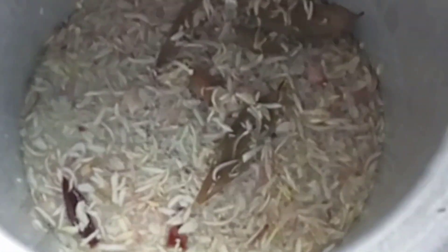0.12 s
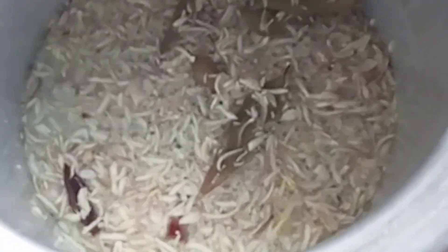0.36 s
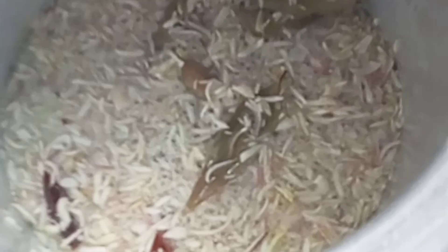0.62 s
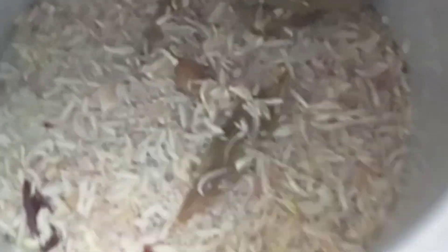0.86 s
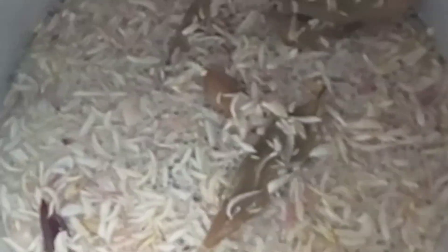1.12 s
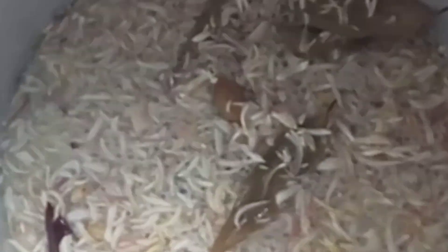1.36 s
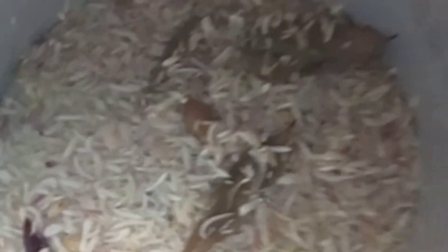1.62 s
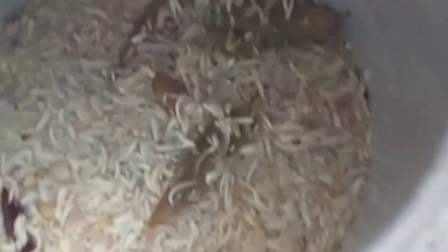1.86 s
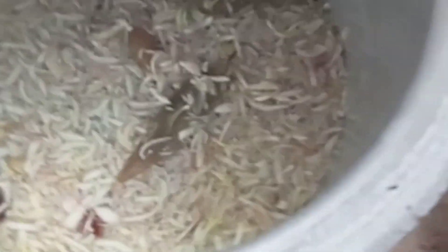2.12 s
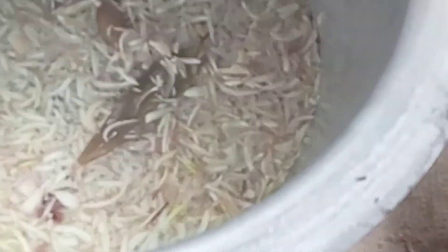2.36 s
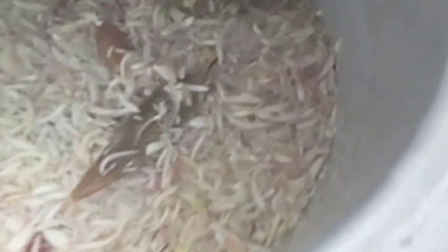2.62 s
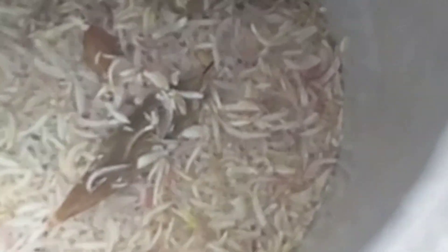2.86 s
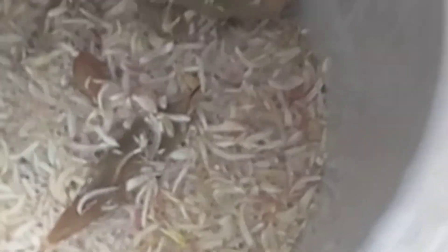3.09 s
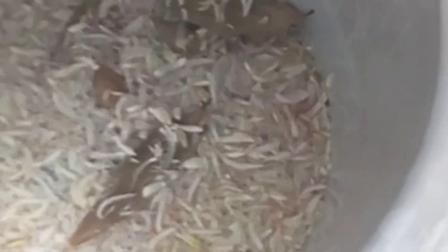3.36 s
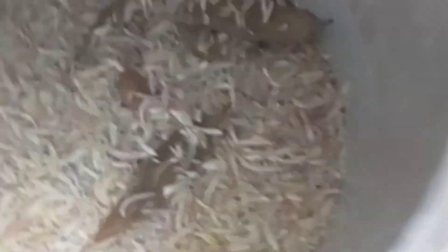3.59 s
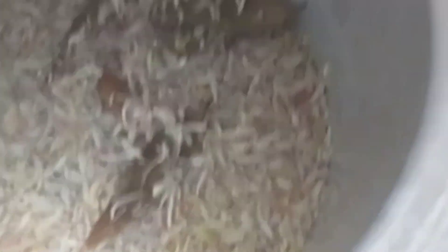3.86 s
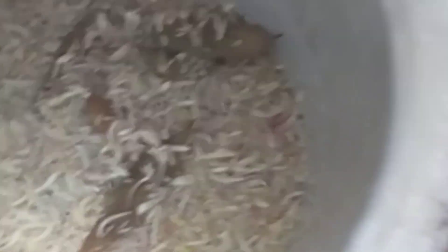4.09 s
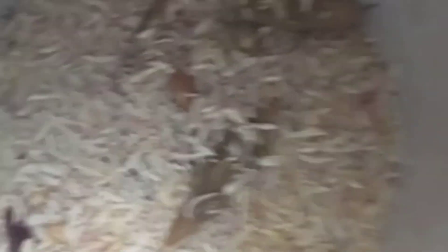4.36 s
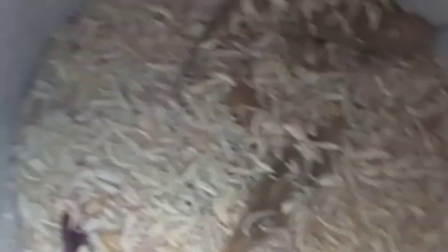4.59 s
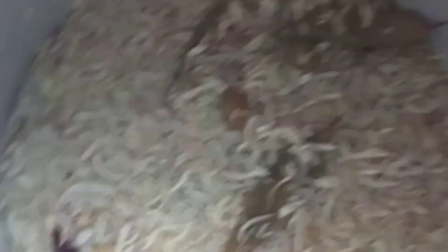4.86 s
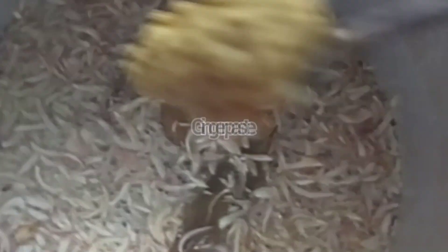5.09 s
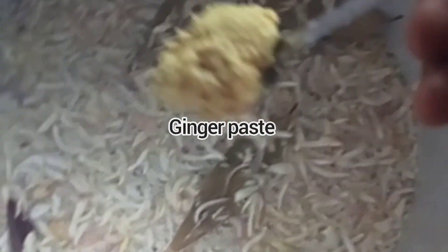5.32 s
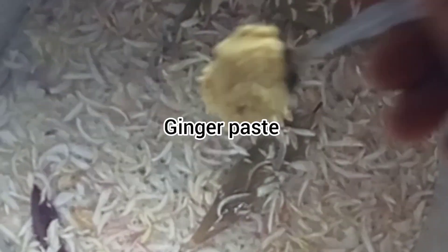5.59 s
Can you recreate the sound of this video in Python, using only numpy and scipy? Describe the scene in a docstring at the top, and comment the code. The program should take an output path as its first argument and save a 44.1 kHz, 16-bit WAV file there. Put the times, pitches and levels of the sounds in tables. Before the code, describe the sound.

Close to a phone microphone in a small kitchen, a metal pot of rice simmers with faint gurgles, thin hiss and low burner rumble. Light ticks begin early, then a utensil knocks and scrapes the pot around 1.5 seconds with a dense run of clicks. Ticks thin out after three seconds, two sharp spits snap near four, and the bubbling ends a little livelier.

```python
"""A pot simmers on a stove in a small kitchen, close to a phone microphone, for 5.7 seconds. Throughout, shaped
noise gives steam hiss and burner rumble, and gliding tones give gurgling bubbles. From 0.3 s damped pot modes
tick, thickest from 1.4 to 2.2 s; from 0.8 s drops spit as noise bursts. At 0.8, 1.2 and 1.5 s a utensil knocks
dully on the pot; at 0.8 s a short rough splash goes with it, and at 1.5 s the utensil scrapes along the pot. An
echo and a short diffuse tail put these events in the room."""
import sys
import numpy as np
from scipy import signal
from scipy.io import wavfile
from scipy.ndimage import uniform_filter1d

SR = 44100
rng = np.random.default_rng(int(sys.argv[2]) if len(sys.argv) > 2 else 0)


def gain_from_db(level_db):
    """Turn a decibel level (scalar or array-like) into a linear amplitude factor."""
    decades = np.asarray(level_db, float) / 20
    return 10 ** decades


def master_out(mix):
    """Clip the mix to full scale and print it as 16-bit PCM to the path in sys.argv[1]."""
    frames = np.transpose(np.atleast_2d(mix))
    ceiling = np.clip(frames, -1, 1)
    pcm = np.round(ceiling * 32767).astype(np.int16)
    wavfile.write(sys.argv[1], SR, pcm)


N = 251811  # length in samples

# All event levels are at the microphone, before the echo and tail of the room.
# Larger bubbles. Each row: start in seconds, peak level in dB, starting pitch in Hz, length in cycles.
BUBBLES = [(.065, -37, 730, 6.9), (0.134, -33, 950, 5.3), (.18, -38, 700, 7), (0.331, -40, 1150, 9.5),
           (0.528, -30.5, 692, 17), (.69, -36, 1120, 8), (1.016, -33, 1320, 6.2), (1.295, -36, 756, 10),
           (1.76, -44, 610, 10), (1.815, -32, 720, 11.6), (2.1, -30, 1540, 12), (2.3, -32, 670, 5.5),
           (2.547, -35.5, 1100, 8.1), (2.606, -38, 930, 14), (2.803, -34.5, 1250, 10),
           (2.8, -40.5, 375, 18), (2.897, -38, 813, 12), (3.044, -35, 1110, 7.7), (3.093, -36, 1050, 13),
           (3.23, -36, 292, 14), (3.28, -30, 920, 8.6), (3.914, -38.5, 790, 18), (3.44, -39, 816, 10),
           (3.77, -40, 800, 6.6), (4.029, -32.5, 1180, 7.4), (4.34, -40, 770, 8.7), (4.461, -35, 1000, 15),
           (4.521, -36, 764, 5.9), (4.723, -42, 594, 11), (4.79, -38, 700, 7), (4.93, -41, 1310, 7),
           (5.024, -48, 695, 8.9), (5.035, -39.5, 279, 19), (5.055, -36, 1250, 6.5), (5.15, -30, 650, 5.8),
           (5.21, -35.5, 254, 6.6), (5.234, -29, 644, 4.5), (5.265, -29, 666, 7.5), (5.279, -32, 766, 7.6),
           (5.4, -45, 700, 23), (5.459, -40.5, 275, 10), (5.54, -37.5, 356, 10.4), (5.546, -32.5, 720, 12),
           (5.668, -33, 680, 5.2)]
# Pitch balance of the small bubbles. Each row: pitch in Hz, relative level in dB.
FROTH = [(250, 3), (420, -9), (680, 2), (1000, -2), (1600, -6.5)]
# Vigour of the boil, before its random surges. Each row: time in seconds, gurgle level in dB.
BOIL = [(0, -51), (.15, -44), (.3, -52), (.7, -47), (1.1, -47.5), (1.3, -46), (1.8, -47), (2.1, -50),
        (2.6, -51), (2.72, -50.5), (3.1, -49.5), (3.6, -51), (4.2, -47), (4.4, -51.5), (4.8, -47.5),
        (5.3, -54), (5.45, -50), (5.71, -50)]
# Clearer ticks on the pot. Each row: start in seconds, peak level in dB, centre in Hz,
# spread in octaves, time until damped to half in ms.
TICKS = [(0.278, -19, 3540, 0.42, 7.1), (0.3024, -25.5, 2930, .33, 2.8), (.3825, -26.5, 4660, 0.58, 3),
         (.6424, -21, 3300, 1.3, 4), (0.8302, -21.5, 2810, 0.44, 5), (.9048, -23, 4500, 0.94, 4),
         (1.1505, -22, 3300, 0.97, 3.7), (1.161, -26, 2730, .23, 7.1), (1.4566, -29, 6500, .5, 3),
         (1.4794, -12.5, 3230, .3, 3.2), (1.507, -10, 2580, 0.18, 2.7), (1.5499, -13, 2600, .15, 3.1),
         (1.6471, -12, 3000, 0.27, 3.4), (1.675, -19.5, 3380, .6, 2.9), (1.7674, -20, 3660, .46, 3.6),
         (1.773, -19, 3320, 0.49, 4.4), (1.8357, -22.5, 3640, 0.46, 4.9), (1.844, -32, 6400, .4, 3.9),
         (1.8854, -28.5, 6130, 0.19, 11), (1.8958, -19, 3700, .88, 0.97), (1.9691, -8.5, 2800, 0.37, 6.2),
         (2.0985, -22.5, 2040, .7, 20), (2.1465, -19.5, 3110, 0.32, 7.6), (2.2027, -33.5, 7140, .16, 6.8),
         (2.5584, -25, 3160, .44, 7.6), (2.6346, -17.5, 3040, 0.3, 6.5), (2.7703, -28.5, 3100, 0.31, 2.2),
         (2.9762, -24.5, 3780, .77, 4.3), (3.0865, -17.5, 3020, .39, 2.4), (3.1636, -13, 3220, 0.28, 8.3),
         (3.3201, -20, 3280, 0.42, 8.8), (3.509, -29.5, 5900, .17, 5.8), (3.6217, -21, 3640, 0.49, 10),
         (4.3942, -23.5, 3680, 0.55, 3.1), (5.141, -22.5, 3090, 0.23, 5.2)]
# Modes of the pot. Each row: nominal frequency in Hz, relative level in dB, t60 in seconds.
POT_MODES = [(1330, 2, .02), (1710, 6, 0.022), (1950, 4.5, 0.035), (2160, -30, 0.012), (2676, 11, 0.055),
             (2910, 8, 0.045), (3430, 9.5, 0.028), (3804, 4.5, 0.16), (4190, 3.5, 0.014), (4570, 1, 0.027),
             (5600, 0.5, 0.027), (6400, 0.5, 0.044), (7550, 9, .02)]
# Spitting drops. Each row: start in seconds, peak level in dB, brightness in dB per octave,
# length of the spray in ms, extra level above 13 kHz in dB.
SNAPS = [(.775, -29, 12, 1.5, 2), (0.8007, -24, 6.5, 2, -1), (1.1861, -2.5, 0.5, 2.25, -1),
         (1.507, -4, -2, 14.6, 2), (3.887, -5.5, 4.5, 3.1, 5), (4.27, -26, 3, 2, 10),
         (4.2989, -4, 7.5, 2.8, 8.5), (4.749, -27.5, 1, 2, 0)]
# Spectrum of a spitting drop. Each row: frequency in Hz, relative density in dB per Hz.
SNAP_SPECTRUM = [(180, -34), (400, 0), (1060, 4), (2170, 9.5), (2840, 14.5), (3900, 1), (5160, -11),
                 (7080, 10.5), (8000, 6), (9400, -2.5), (12000, -9), (15200, -11), (16800, -12)]
# Dull utensil knocks. Each row: start in seconds, peak level in dB, pitch in Hz, t60 in seconds.
KNOCKS = [(.823, -15, 504, 0.015), (0.843, -22, 413, 0.022), (0.858, -25.5, 432, 0.038),
          (1.162, -31, 345, 0.033), (1.214, -30, 349, 0.2), (1.507, -19, 314, 0.19),
          (1.55, -27, 284, 0.062)]
# Rough rubbing noise, one list a stroke: first a short rough splash at 0.8 s, then the utensil rubbing on the
# pot at 1.5 s. Each row: time in seconds, pressure level in dB.
SCRAPES = [
    [(.823, -33), (.835, -35), (.85, -35.5), (.875, -44)],
    [(1.508, -15.5), (1.525, -26.5), (1.545, -33), (1.555, -22), (1.565, -17), (1.575, -20), (1.6, -22),
     (1.62, -33), (1.645, -29.5)],
]
# Spectrum of rubbed metal. Each row: frequency in Hz, relative density in dB per Hz.
RUBBED_SPECTRUM = [(100, -36), (240, 4.5), (370, 1), (520, -16), (860, 1.5), (1150, -6.5), (1400, -4),
                   (2300, -1.5), (2640, -0.5), (3400, -10.5), (4900, -20), (6500, -25), (7000, -3.5),
                   (7700, -11.5), (8900, -28.5), (14000, -32)]
# Steam hiss with the peaks of the microphone port. Each row: frequency in Hz, relative density in dB per Hz.
HISS_SPECTRUM = [(700, -24), (1300, -15.5), (1900, -10), (2300, -7.5), (2650, 0), (3300, -1), (4200, -9.5),
                 (5200, -23), (6500, -14.5), (7400, -6.5), (8900, -22.5), (10300, -25), (11600, -28),
                 (15300, -20.5), (15800, -60)]
# Slow drift of the steam. Each row: time in seconds, relative hiss level in dB,
# extra level from 5.2 to 9.5 kHz in dB, extra level above 9.5 kHz in dB.
STEAM_DRIFT = [(0, 0.5, -0.5, -0.5), (.6, 0, -0.5, 0.5), (1, 3.5, -0.5, -1), (2, -1, 1.5, 1),
               (2.5, 0, 1, 0), (3.4, 1, 0.5, 0.5), (3.65, 2.5, 1.5, 2), (3.8, 2.5, 1, 0),
               (4.1, 1.5, 0.5, 0.5), (5.71, 0, 3.5, 2.5)]
# Burner rumble under the pot. Each row: frequency in Hz, relative density in dB per Hz.
RUMBLE_SPECTRUM = [(30, -33), (50, -19), (76, 5.5), (105, -3), (150, 1.5), (200, -7), (300, -10), (430, -9),
                   (650, -6.5), (1000, -15.5), (1800, -22)]
# Decay of the kitchen. Each row: frequency in Hz, t60 in seconds.
KITCHEN_DECAY = [(200, 0.24), (1000, 0.21), (3000, 0.15), (8000, 0.12), (15000, 0.2)]


def evened(x):
    """Scales to an rms of one."""
    return x / np.sqrt(np.mean(x ** 2) + 1e-20)


def peaked(x):
    """Scales to a peak of one."""
    return x / (abs(x).max() + 1e-20)


def read(points, hz):
    """Reads a table over frequency on a log-frequency axis."""
    f, value = np.transpose(points)
    return np.interp(np.log(hz + 1), np.log(f + 1), value)


def add(mix, s, sound):
    """Adds a sound to the mix at s seconds."""
    part = mix[round(s * SR):][:len(sound)]
    part += sound[:len(part)]


def coloured(x, points, tilt_db=0):
    """Minimum-phase filter, its phase taken from the log gain; the tilt in dB per octave turns about 3 kHz."""
    hz = abs(np.fft.fftfreq(4096, 1 / SR))
    gain_db = read(points, hz) + tilt_db * np.log2((hz + 1) / 3000)
    log_gain = np.log(gain_from_db(np.maximum(gain_db, -100)))
    taps = np.fft.ifft(np.exp(np.conj(signal.hilbert(log_gain)))).real[:1024]
    return signal.oaconvolve(x, taps)


def noise(field_db, size):
    """Noise of rms one from random short-time spectra under a dB field of bins by frames."""
    a, b = rng.standard_normal(field_db.T.shape + (2,)).T
    spectra = (a + 1j * b) * gain_from_db(field_db)
    return evened(signal.istft(spectra, nperseg=size, noverlap=size * 3 // 4)[1][:N])


def patches(bins, frames, wide, long):
    """Random field of rms one, smoothed over a number of bins and of frames."""
    field = rng.standard_normal((frames, bins)).T
    return evened(uniform_filter1d(uniform_filter1d(field, size=wide, axis=0), size=long, axis=1))


def random_bursts(per_s, spread_db):
    """Impulses at random samples, with an exponential spread of levels in dB."""
    strength = gain_from_db(spread_db * np.minimum(rng.exponential(1, N), 4))
    return strength * (rng.random(N) < per_s / SR)


def bubble(hz, cycles, glide):
    """A pocket of steam rings and rises in pitch as it reaches the surface."""
    u = np.arange(0, 1, hz / (SR * max(cycles, 2)))  # share of its life
    ring = np.sin(2 * np.pi * cycles * (u + glide * u ** 2))
    return peaked(ring * u ** 0.89 * (1 - u) ** 2.23)


def boil_level():
    """Gurgle gain: the boil swells and sinks at random, and froth rises around every larger bubble."""
    points_per_s, surge_db = 18, 3
    trail_db, trail_lead_s, trail_s = -45, 0.021, 0.058
    t, (s, db) = np.arange(N) / SR, np.transpose(BOIL)
    swings = np.interp(t * points_per_s, np.arange(200), rng.standard_normal(200))
    surge = gain_from_db(np.interp(t, s, db) + surge_db * np.clip(swings, -3, 1.5))
    trails = np.zeros(N)
    for start, *_ in BUBBLES:
        add(trails, start - trail_lead_s, np.hanning(round(trail_s * SR)))
    return surge + gain_from_db(trail_db) * np.minimum(trails, 1)


def gurgle(per_s, spread_db, calm_db):
    """Many short bubbles of thirty sizes come in random clumps; their level follows the surging boil."""
    clumps = np.exp(0.45 * evened(signal.resample(rng.standard_normal(N // 500), N)))
    starts = random_bursts(clumps * per_s, spread_db)
    kind, shape, out = rng.integers(0, 30, N), rng.random((30, 2)), np.zeros(N)
    for k, hz in enumerate(np.geomspace(FROTH[0][0], FROTH[-1][0], 30)):
        grain = bubble(hz, 4 + 7 * shape[k, 0], 0.19 * shape[k, 1])
        grain = grain * gain_from_db(read(FROTH, hz)) * np.sqrt(hz)  # the root makes up for shorter high grains
        out += signal.oaconvolve(starts * (kind == k), grain)[:N]
    return np.hypot(boil_level(), gain_from_db(calm_db)) * evened(out)  # the boil never stops between surges


def tick(db, hz, octaves, ms, chance):
    """The pot modes near the centre ring together, and are damped soon after the contact ends."""
    t = np.arange(1300) / SR
    ring = np.zeros(len(t))
    for (f, level, t60), c in zip(POT_MODES, chance):
        off_centre_db = 12.7 * (np.log2(f / hz) / octaves) ** 2
        mode_hz = f * (0.9615 + 0.12 * c)  # a little different at each tick
        ring += gain_from_db(level - off_centre_db - 60 * t / t60) * np.sin(2 * np.pi * mode_hz * t)
    damped = 1 / (1 + (t / (max(ms, 0.5) / 1000)) ** 4)
    onset = np.minimum(t / 0.00082, 1)
    return gain_from_db(db) * peaked(ring * damped * onset)


def faint_ticks(per_s):
    """Rows like those of TICKS, at random moments, levels and centres."""
    a, b, c = rng.random((round(per_s * N / SR), 3)).T
    hz = 2800 * (7300 / 2800) ** c
    octaves, ms = 0.54, 4
    return [(s, db, f, octaves, ms) for s, db, f in zip(a * N / SR, -35 - 0.5 * b, hz)]


def snap(db, tilt_db, ms, top_db, grain):
    """The skin of a drop bursts with a sharp front, then a few milliseconds of noisy spray."""
    t = np.arange(len(grain)) / SR
    spray = grain * (np.exp(-(t / (max(ms, 0.5) / 1000)) ** 3) + 0.61 * np.exp(-t / 0.0048))
    colour = [(hz, level + top_db * (hz > 13000)) for hz, level in SNAP_SPECTRUM]
    front = 9 * coloured(1.0 * (t == 0), SNAP_SPECTRUM)
    return gain_from_db(db) * peaked(coloured(spray, colour, tilt_db) + front)


def knock(db, hz, t60):
    """A dull thud: a decaying mode with one weaker mode below and one above."""
    t = np.arange(6000) / SR
    modes = [(0.55, 0.22), (1, 1), (1.3, 0.16)]  # ratio to the pitch, share
    ring = sum(share * np.sin(2 * np.pi * ratio * hz * t) for ratio, share in modes)
    onset = np.minimum(t / 0.0041, 1)
    return gain_from_db(db) * peaked(ring * gain_from_db(-60 * t / t60) * onset)


def scrape(rows, grit_db=3.5):
    """Dense uneven slips with the colour of rubbed metal under the pressure curve; light strokes are duller."""
    s, db = np.transpose(rows)
    t = np.arange(s[0], s[-1], 1 / SR)
    grit = evened(uniform_filter1d(rng.standard_normal(8000), size=60))
    slips = rng.standard_normal(8000) * gain_from_db(grit_db * grit)
    tilt_db = 0.12 * (db.max() + 21.5)
    sound = evened(coloured(slips, RUBBED_SPECTRUM, tilt_db)[:len(t)])
    return s[0], sound * gain_from_db(np.interp(t, s, db)) * signal.windows.tukey(len(t), 0.1)


def hiss(level_db, patchy_db):
    """Smooth steam noise that drifts slowly, with faint drifting patches."""
    t, hz = np.arange(N // 256 + 5) * 256 / SR, np.fft.rfftfreq(1024, 1 / SR)
    s, *columns = np.transpose(STEAM_DRIFT)
    drift_db, mid_db, top_db = (np.interp(t, s, c) for c in columns)
    fizz_db = np.outer((hz > 5200) & (hz < 9500), mid_db) + np.outer(hz >= 9500, top_db)
    patch_db = patchy_db * patches(len(hz), len(t), wide=10, long=8)
    field_db = read(HISS_SPECTRUM, hz)[:, None] + drift_db + fizz_db + patch_db
    return gain_from_db(level_db) * noise(field_db, size=1024)


def crackle(level_db, per_s, spread_db):
    """Tiny decaying steam bursts, too many to tell apart, with the colour of the hiss."""
    decay = np.exp(-np.arange(200) / 40)
    bursts = signal.oaconvolve(random_bursts(per_s, spread_db), decay)[:N] * rng.standard_normal(N)
    return gain_from_db(level_db) * evened(coloured(bursts, HISS_SPECTRUM)[:N])


def rumble(level_db, swell_db):
    """Low noise of the flame, swelling a little in broad bands."""
    hz = np.fft.rfftfreq(8192, 1 / SR)
    outside_octaves = abs(np.log2(np.clip(hz, 30, 1800) / (hz + 1)))
    fading_db = read(RUMBLE_SPECTRUM, hz) - 12 * outside_octaves
    swell = patches(len(hz), N // 2048 + 5, wide=12, long=5)
    return gain_from_db(level_db) * noise(fading_db[:, None] + swell_db * swell, size=8192)


def kitchen(x):
    """Three dense tails take turns, each band dying at its own speed, so that like hits ring differently."""
    taps = rng.standard_normal((3, SR // 2)) * (np.arange(SR // 2) > 130)  # silent for the first 3 ms
    hz, t, z = signal.stft(taps, SR, nperseg=256)
    decay = gain_from_db(-60 * t / read(KITCHEN_DECAY, hz)[:, None])
    tails = signal.istft(z * decay, SR, nperseg=256)[1]
    phase = np.arange(N) * 40 / SR + np.arange(3)[:, None] / 3  # 40 turns a second
    turn = np.sqrt(2 / 3) * np.cos(2 * np.pi * phase)
    return signal.oaconvolve(x * turn, tails / np.linalg.norm(tails[0]), axes=1).sum(0)[:N]


def scene():
    """Close events ring into the kitchen over the steady simmer."""
    events = gurgle(per_s=480, spread_db=2.5, calm_db=-53.5)
    for s, db, hz, cycles in BUBBLES:
        add(events, s, gain_from_db(db) * bubble(hz, cycles, glide=0.018))
    ticks = TICKS + faint_ticks(per_s=2)
    for (s, *row), chance in zip(ticks, rng.random((len(ticks), len(POT_MODES)))):
        add(events, s, tick(*row, chance))
    for s, *row in SNAPS:
        add(events, s, snap(*row, rng.standard_normal(2500)))
    for s, *row in KNOCKS:
        add(events, s, knock(*row))
    for rows in SCRAPES:
        add(events, *scrape(rows))
    events += gain_from_db(-13.5) * np.roll(events, round(0.0081 * SR))  # one echo off a near wall
    steam = hiss(level_db=-42, patchy_db=1.92) + crackle(level_db=-53.5, per_s=200, spread_db=1.5)
    simmer = steam + rumble(level_db=-49, swell_db=3)
    return (simmer + events + gain_from_db(-8.5) * kitchen(events))[None]


def low_pass(x):
    """Removes everything above the highest recorded frequency."""
    return signal.sosfilt(signal.butter(12, 16810, fs=SR, output="sos"), x)


def record(dry):
    """The top band is cut hard, leaving a faint shelf."""
    edge_hz, shelf_db = 15550, -24
    lowpass = signal.firwin(511, edge_hz, window=("kaiser", 8), fs=SR)
    low = signal.oaconvolve(dry, lowpass[None], "same")
    mix = low + gain_from_db(shelf_db) * (dry - low)
    return low_pass(mix)


dry = scene()
out = record(dry)
master_out(out)
```